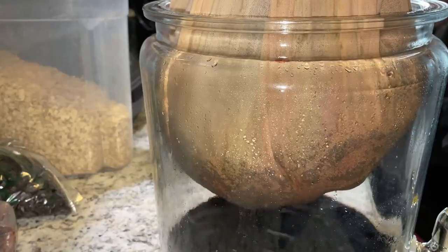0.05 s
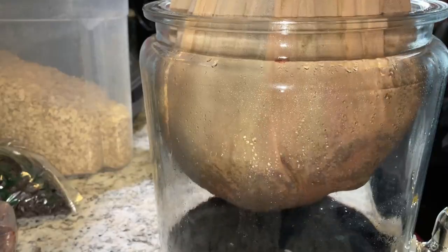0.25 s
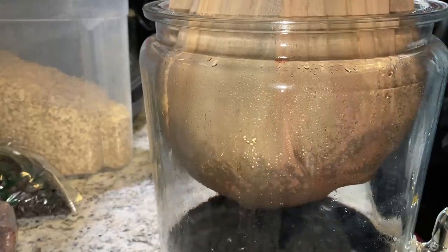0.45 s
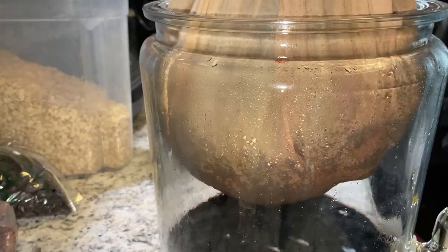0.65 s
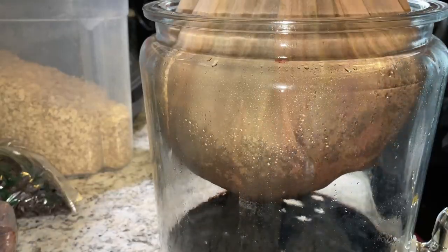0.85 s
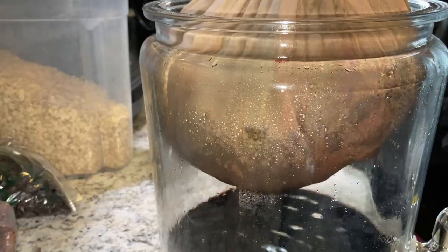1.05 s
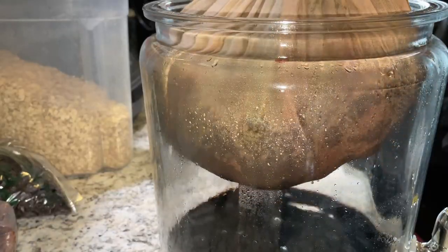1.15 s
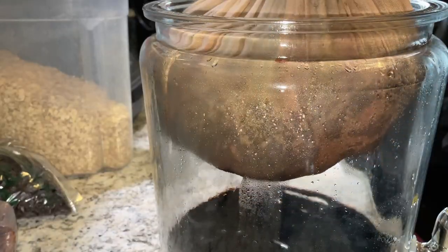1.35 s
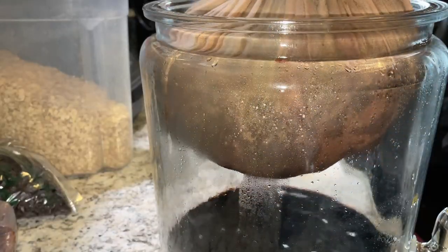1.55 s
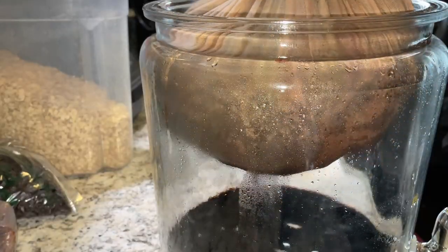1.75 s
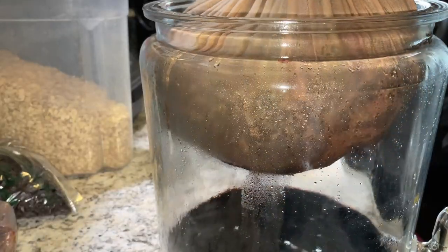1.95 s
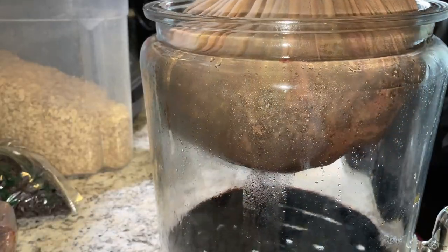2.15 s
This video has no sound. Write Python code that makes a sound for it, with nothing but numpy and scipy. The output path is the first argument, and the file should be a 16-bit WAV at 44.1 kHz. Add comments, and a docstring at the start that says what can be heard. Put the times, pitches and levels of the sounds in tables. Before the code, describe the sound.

Heard close up in a quiet kitchen, a glass jar gives one sharp, chattering knock with a small gulp. Light, irregular drips then plink into the liquid inside while a wet cloth bag rubs softly over the rim.

```python
"""Wet filter bag in a glass jar

A quiet kitchen, one microphone close to a jar in which a wet filter bag is drawn up and twisted.
The jar knocks on the counter, chatters briefly and jolts its pool into one gulp. Drops plink in as
ringing bubbles and sound the jar's air, while the cloth rubs over the rim with a fine hiss.
Behind it all the room rumbles faintly."""
import sys
import numpy as np
from scipy import signal
from scipy.fft import rfft, irfft
from scipy.io import wavfile

SR = 44100
rng = np.random.default_rng(int(sys.argv[2]) if len(sys.argv) > 2 else 0)


def put_to_file(sound):
    """Save the sound as 16-bit audio at rate SR, in the file named by the first command-line argument."""
    columns = np.atleast_2d(sound).T  # one column per channel
    safe = np.clip(columns, -1, 1)
    whole_steps = np.round(safe * 32767)
    wavfile.write(sys.argv[1], SR, whole_steps.astype(np.int16))


N = 94815
T = np.arange(N) / SR

# the jar's base striking the counter: (time [s], force [dB], softness as low-pass [Hz])
BASE_CONTACTS = [(0.2384, -4, 895), (0.2429, -4, 8200), (0.2544, -5, 3700), (0.2638, -3, 6000),
                 (0.2667, 0.5, 3130), (0.2774, -2.5, 1263), (0.2879, 2, 1365)]
# low modes of the jar on the counter: (frequency [Hz], relative level [dB], t60 [s])
BODY_MODES = [(192, -24, 0.32), (262.7, -30, 0.38), (390, -21.5, 0.19), (503, -18, 0.029),
              (589.2, -19.5, 0.096), (762, -24.5, 0.055), (924, -26, 0.063), (1127, -34, 0.13),
              (1417, -29, 0.064), (1683, -23.5, 0.014)]
# bright modes of the glass wall: (frequency [Hz], relative level [dB], t60 [s])
WALL_MODES = [(2814, -34, 0.067), (4983, -44, 0.13), (7400, -59.5, 0.08)]
# dense, quickly damped part of each contact: (frequency [Hz], relative level [dB])
THUD_SPECTRUM = [(40, -15.5), (90, -0.5), (200, -6), (1750, -2), (2250, -17), (3200, -14.5), (4400, -29),
                 (15000, -43.5)]
# drops landing in the pool: (time [s], relative level [dB], bubble pitch [Hz])
POOL_DROPS = [(0.117, -53, 1836), (0.122, -61, 3200), (0.4895, -49.5, 1286), (0.652, -53, 1890),
              (0.666, -50.5, 1886), (0.7848, -47.5, 1872), (0.7905, -42.5, 2020), (0.8840, -54.5, 1870),
              (0.9295, -54.5, 1840), (0.948, -59.5, 1515), (1.0264, -50, 2460), (1.0812, -55, 1853),
              (1.1572, -61, 1930), (1.205, -51.5, 1100), (1.271, -59, 1815), (1.316, -48, 1776),
              (1.342, -48.5, 2470), (1.3433, -53, 1600), (1.363, -55, 1283), (1.5639, -55, 1056),
              (1.597, -54.5, 2050), (1.614, -54, 1797), (1.6616, -55, 1330), (1.6868, -51.5, 1070),
              (1.834, -47.5, 1820), (1.836, -46.5, 1286), (1.9133, -47.5, 1715), (1.9390, -53.5, 862),
              (1.944, -46.5, 1863), (1.9685, -55.5, 1246), (2.0119, -44, 1040), (2.026, -50.5, 1300),
              (2.0400, -51, 858)]
# resonances of the air in the jar: (frequency [Hz], relative gain [dB], width [Hz])
AIR_MODES = [(1100, -19.5, 41), (1330, -4, 37), (1600, 2.5, 300), (1837, 13, 47), (2497, 8, 42)]
# cloth rubbing over the rim: (time [s], level [dB])
RUB_LEVELS = [(0.0, -86.5), (0.335, -102.5), (0.362, -66), (0.43, -65.5), (0.47, -72), (0.533, -72.5),
              (0.545, -69.5), (0.625, -55.5), (0.668, -62.5), (0.695, -50), (0.712, -63), (0.885, -61),
              (0.905, -73), (1.04, -71.5), (1.33, -75), (1.46, -87.5), (1.52, -72.5), (1.72, -70.5),
              (1.78, -62.5), (1.905, -65.5), (1.918, -58.5), (1.947, -52.5), (1.96, -64.5), (2.15, -74.5)]
# its hiss from close by: (frequency [Hz], relative level [dB])
HISS_SPECTRUM = [(900, -4.5), (3500, -1), (4200, -2), (5000, 0), (6300, -3), (9000, 1), (11500, -0.5),
                 (13500, -5), (15700, -16.5)]
# wet snaps of the cloth: (time [s], relative level [dB], centre [Hz], width [share of centre])
CLOTH_SNAPS = [(0.5443, -50, 8800, 0.21), (1.12, -52.5, 7850, 1), (1.31, -59, 5500, 0.6),
               (1.601, -47, 9370, 0.12), (1.6, -50, 5460, 0.27), (1.811, -53.5, 2860, 0.39),
               (1.913, -52.5, 7070, 0.18), (2.012, -52, 3580, 0.082)]
# the kitchen's answer to the knock: (frequency [Hz], relative level [dB])
REVERB_SPECTRUM = [(40, -22), (170, 3.5), (300, -7.5), (550, -7), (1000, -16.5), (1800, -25), (6000, -59.5),
                   (15000, -61)]
# how long that answer lasts: (frequency [Hz], t60 [s])
REVERB_T60 = [(100, 0.51), (200, 0.39), (500, 0.32), (8000, 0.43)]
# room tone of the kitchen: (frequency [Hz], relative level [dB])
RUMBLE_SPECTRUM = [(20, -10.5), (70, 2.5), (130, 1), (200, -5), (300, -11), (420, -10), (560, -23),
                   (900, -22), (1300, -36), (3000, -45.5), (15000, -66)]

SEATING_S, SEATED_DB = (0.27, 0.31), -19   # the jar comes to rest, which damps its ring
BUBBLE_CYCLES, BUBBLE_ATTACK_S = 52.8, 0.0033   # cycles to fall 60 dB
SPLASH_HZ = (998, 2834)
SPRAY_DELAY_S, SPRAY_DB = (0.01, 0.095), -13   # each drop throws up a droplet that falls back


def jar_knock():
    """The jar's base chatters on the counter; every contact thuds and rings the same modes."""
    blows, thud, body = [], 0, 0
    for s, db, hz in BASE_CONTACTS:
        click = 1.0 * (np.arange(N) == int(s * SR))
        blows.append(from_db(db) * soften(click, hz))
        thud += from_db(db) * soften(noise() * fall(T - s, t60=0.022), hz)
    for k, (hz, db, t60) in enumerate(BODY_MODES):
        strengths = from_db(db + rng.normal(0, 2.4, len(blows)))
        body += (-1) ** k * ring(strengths @ np.array(blows), hz, t60)
    seating = from_db(np.interp(T, SEATING_S, [0, SEATED_DB]))
    return (body + glass_wall()) * seating + from_db(-22) * colour(thud, THUD_SPECTRUM)


def glass_wall():
    """The contacts feed a short, bright ring in the jar's wall, roughened by the chatter."""
    wall = 0
    for hz, db, t60 in WALL_MODES:
        power = sum((from_db(force_db) * fall(T - s, t60)) ** 2 / (1 + (hz / soft_hz) ** 2)
                    for s, force_db, soft_hz in BASE_CONTACTS)
        roughness = 0.81 * rms_one(resonate(noise(), hz, width_hz=90))
        wall += from_db(db) * np.sqrt(power) * (np.sin(2 * np.pi * hz * T) + roughness)
    return wall


def gulp(start_s=0.3145, attack_s=0.013):
    """The jolted pool gives one hollow gulp that rises slightly."""
    age = np.maximum(T - start_s, 0)
    swell = from_db(-38) * (1 - np.exp(-age / attack_s))
    return swell * fall(age, t60=0.18) * rising_sine(age, hz=532, rise_per_s=1.5)


def plinks():
    """Each drop and its droplet splash and trap a bubble that rings with rising pitch."""
    droplets = [(s + rng.uniform(*SPRAY_DELAY_S), db + SPRAY_DB, rng.uniform(*SPLASH_HZ))
                for s, db, _ in POOL_DROPS]
    bubbles, splash = np.zeros(N), np.zeros(N)
    for s, db, hz in list(POOL_DROPS) + droplets:
        now = slice(int(s * SR), int(s * SR) + SR // 10)
        age = np.maximum(T[now] - s, 0)
        swell = from_db(db) * (1 - np.exp(-age / BUBBLE_ATTACK_S))
        bubbles[now] += swell * fall(age, BUBBLE_CYCLES / hz) * rising_sine(age, hz, rise_per_s=3.16)
        splash[now] += swell * fall(age, t60=0.036)
    spatter = rms_one(band(band(noise(), SPLASH_HZ), SPLASH_HZ))
    return from_db(4.5) * bubbles + from_db(-9.5) * splash * spatter


def drips_in_jar():
    """Plinks and the stirred pool keep the jar's air humming; its walls and the room reflect it."""
    direct = plinks()
    stir = np.sqrt(sum((from_db(db) * fall(T - s, t60=0.26)) ** 2 for s, db, _ in POOL_DROPS))
    slosh = from_db(-16.5) * stir * rms_one(band(noise(), SPLASH_HZ))
    air = sum(from_db(db) * resonate(direct + slosh, hz, width) for hz, db, width in AIR_MODES)
    jar = direct + air / 2
    off_glass = echoes(jar, T < 0.012)
    off_room = echoes(jar, fall(T, t60=0.16))
    return jar + from_db(-13) * (off_glass + off_room)


def cloth_rub(grains_per_s=2500, grain_share=0.075):
    """Threads slip over the rim: a flickering hiss with fine grains."""
    grains = 1.0 * (rng.random(N) < grains_per_s / SR)
    grains *= from_db(-2.5 * np.minimum(rng.exponential(1, N), 5))
    grains *= rng.choice([-1, 1], N)
    slips = np.sqrt(grain_share) * rms_one(grains) + np.sqrt(1 - grain_share) * noise()
    flicker_db = 3 * rms_one(band(noise(), hz=70, kind="low"))
    level_db = np.interp(T, *np.transpose(RUB_LEVELS))
    return colour(slips * from_db(level_db + flicker_db), HISS_SPECTRUM)


def cloth_snaps():
    """The wet cloth gives a few small snaps, each a short burst in its own band."""
    snaps = 0
    for s, db, hz, width in CLOTH_SNAPS:
        edges_hz = hz * (1 + width * np.array([-.5, .5]))
        snaps += from_db(db) * fall(T - s, t60=0.082) * rms_one(band(noise(), edges_hz))
    return snaps / 2


def kitchen_reverb(delay_s=0.0075):
    """The knock comes back to the microphone off the kitchen and dies away, the bass last."""
    tail, edges_hz = 0, np.geomspace(40, 16000, 10)
    for low, high in zip(edges_hz, edges_hz[1:]):
        t60 = at_hz(REVERB_T60, np.sqrt(low * high))
        power = sum((from_db(db) * fall(T - s - delay_s, t60)) ** 2 for s, db, _ in BASE_CONTACTS)
        tail += band(noise() * np.sqrt(power), [low, high])
    return from_db(-39) * colour(tail, REVERB_SPECTRUM)


def room_tone():
    """Steady low rumble of the kitchen behind the jar."""
    return from_db(-57) * colour(noise(), RUMBLE_SPECTRUM)


def noise():
    """White noise at unit rms."""
    return rng.standard_normal(N)


def from_db(db):
    """Decibels to gain."""
    return 10 ** (np.asarray(db) / 20)


def rms_one(x):
    """Scale to unit rms."""
    return x / np.sqrt(np.mean(x ** 2) + 1e-20)


def at_hz(points, hz):
    """Read a table on a log-frequency axis."""
    freqs, values = np.transpose(points)
    return np.interp(np.log(hz + 0.0011), np.log(freqs), values)


def colour(x, spectrum):
    """Causal (minimum-phase) filter with this spectrum and unit power gain."""
    size = 2 * N
    gain = rms_one(from_db(at_hz(spectrum, np.arange(N + 1) * SR / size)))
    cepstrum = irfft(np.log(gain))
    cepstrum[1:N] *= 2
    cepstrum[N + 1:] = 0
    return irfft(rfft(x, size) * np.exp(rfft(cepstrum)))[:N]


def band(x, hz, kind="band"):
    """Second-order Butterworth filter."""
    return signal.sosfilt(signal.butter(2, hz, kind, fs=SR, output="sos"), x + 1e-18)


def resonate(x, hz, width_hz):
    """Resonance with gain 1 at its peak."""
    r, w = np.exp(-np.pi * width_hz / SR), 2 * np.pi * hz / SR
    return signal.lfilter(np.array([1, 0, -1]) * (1 - r * r) / 2, [1, -2 * r * np.cos(w), r * r], x)


def fall(t, t60):
    """Exponential decay from t = 0, down 60 dB after t60 seconds."""
    return (t >= 0) * np.exp(-np.log(1000) * np.clip(t / t60, 0, 10))


def rising_sine(age, hz, rise_per_s):
    """A sine that climbs by this share of its starting pitch each second."""
    return np.sin(2 * np.pi * hz * age * (1 + rise_per_s * age / 2))


def ring(x, hz, t60):
    """A unit click sets a sine of height 1 ringing."""
    r, w = np.exp(-np.log(1000) / (t60 * SR)), 2 * np.pi * hz / SR
    return signal.lfilter([0, np.sin(w)], [1, -2 * r * np.cos(w), r * r], x + 1e-18)


def soften(x, hz):
    """One-pole low-pass: a soft contact."""
    r = np.exp(-2 * np.pi * hz / SR)
    return signal.lfilter([1 - r], [1, -r], x + 1e-18)


def echoes(x, envelope):
    """Dense reflections under this envelope, with unit power gain."""
    return signal.fftconvolve(x, rms_one(noise() * envelope) / np.sqrt(N))[:N]


def scene():
    """Jar, water, cloth and kitchen at one close microphone."""
    knock = jar_knock() + kitchen_reverb()
    water = gulp() + drips_in_jar()
    cloth = cloth_rub() + cloth_snaps()
    return (knock + water + cloth + room_tone())[None]


def record(dry):
    """The top is cut steeply above 15750 Hz."""
    return signal.sosfilt(signal.ellip(12, .1, 80, 15750, fs=SR, output="sos"), dry)


dry = scene()
out = record(dry)
put_to_file(out)
```